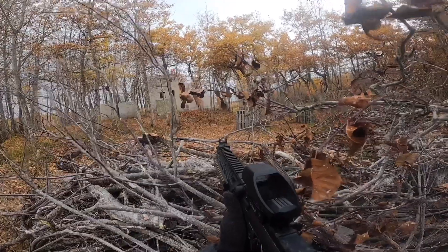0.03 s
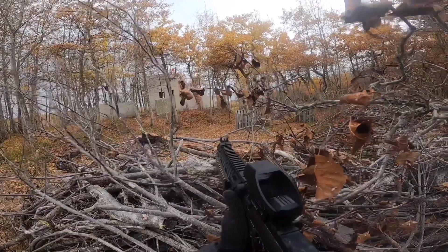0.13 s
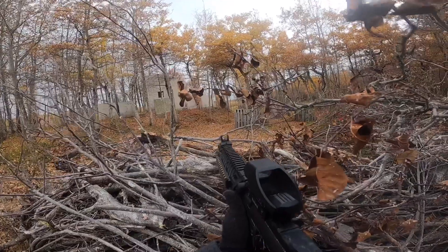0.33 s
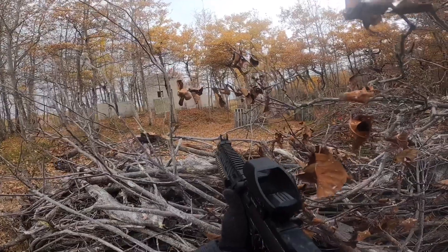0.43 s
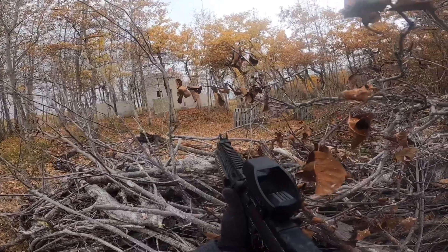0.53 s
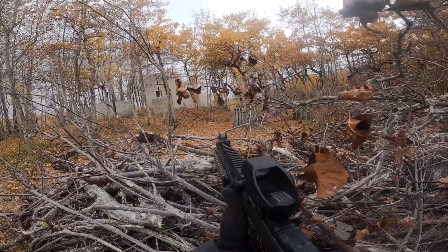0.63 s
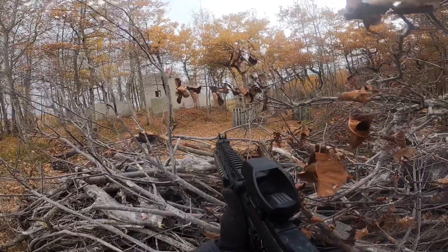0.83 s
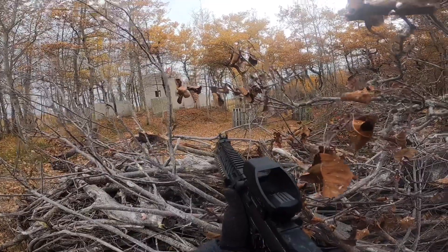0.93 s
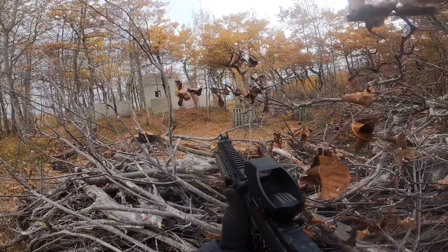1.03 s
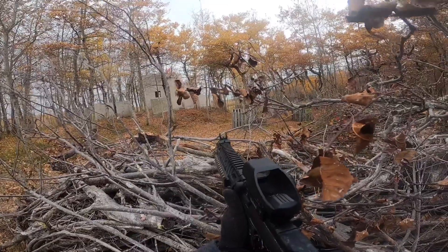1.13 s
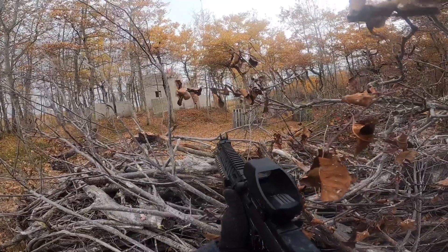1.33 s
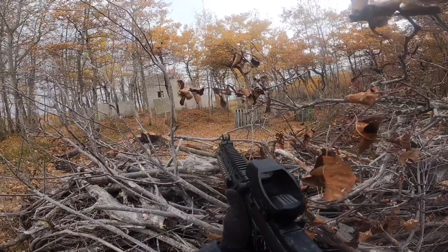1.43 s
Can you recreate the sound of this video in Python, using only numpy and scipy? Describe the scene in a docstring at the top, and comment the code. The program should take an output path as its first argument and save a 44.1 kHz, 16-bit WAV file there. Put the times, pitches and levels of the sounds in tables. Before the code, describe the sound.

A paintball gun fires once with a sharp, rattling clack in quiet woods.

```python
"""Autumn woodland: one paintball shot, heard by a small camera held against the marker (the gun).
The trigger clicks and the bolt clacks to and fro; the marker shudders and the camera housing rings.
The trees echo the clatter, then the ball smacks a far, hollow target. Underneath, leaves hiss, the
hands make a slow rumble, and a few faint tones drift in from afar."""
import sys
import numpy as np
from scipy import signal
from scipy.fft import rfft, irfft, next_fast_len
from scipy.io import wavfile
from scipy.ndimage import uniform_filter1d

SR = 44100
rng = np.random.default_rng(int(sys.argv[2]) if len(sys.argv) > 2 else 0)


def transcribe(signal):
    """Save signal, clipped to [-1, 1], as a 16-bit WAV file at the path in sys.argv[1]."""
    frames = np.atleast_2d(signal).T
    limited = np.clip(frames, -1, 1)
    pcm = np.round(limited * 32767).astype(np.int16)
    wavfile.write(sys.argv[1], SR, pcm)


N = 66150  # 1.5 seconds

# Trigger clicks, bolt clacks and small ticks. A decay is the time taken to fade by 60 dB.
# (time [s], rattle [dB], rattle decay [s], knock [dB], ring [dB], ping [dB], crack [dB],
# left over right [dB])
CLACK_HITS = [(0.2276, -38.5, 0.032, -16.5, -27, -41, -93, -5), (0.237, -56, 0.02, -35, -33, -69, -98, 13),
              (0.2673, -17, 0.039, -4.5, -18.5, -16.5, -37.5, -3.5),
              (0.28, -30, 0.057, -40, -20.5, -49, -61, 6.5),
              (.2855, -15, 0.031, -27.5, -12.5, -22, -73, -10),
              (0.2897, -17.5, 0.031, -11, -14, -29, -72, 4),
              (.298, -22.5, 0.027, -11.5, -22.5, -33.5, -44, 11.5),
              (0.3044, -14, 0.018, -15, -15.5, -27, -67, -1),
              (0.3122, -33, 0.04, -19, -31.5, -40.5, -48.5, 6),
              (0.367, -40.5, 0.018, -39, -42, -56, -89, -2), (0.397, -40, 0.047, -50, -43.5, -66, -61, -5),
              (1.48, -47.5, 0.11, -70, -51, -55, -65, -5.5)]
# Soft bumps on the marker's body: (time [s], level [dB], brightness [dB per octave])
BUMPS = [(1.1481, -38.5, 4.5), (1.158, -44, -8)]
# Shakes of the marker: (start [s], rise [s], hold [s], fall [s], sway [dB], hum [dB])
SHAKES = [(0.033, 0.0049, 0.015, 0.016, -57, -36), (0.21, 0.01, 0.019, 0.02, -28.5, -27),
          (0.266, 0.032, 0.021, 0.033, -13.5, -14.5), (0.384, 0.0075, 0.013, 0.018, -35, -46.5),
          (1.15, 0.0024, 0.0065, 0.023, -64, -37), (1.256, 0.013, 0.014, 0.016, -44, -42.5),
          (1.35, 0.0054, 0.01, 0.012, -55, -49.5)]
# The notes each part rings with when struck: (pitch [Hz], level [dB], decay [s])
BODY_NOTES = [(81.6, -1, 0.058), (193, 1.5, 0.053), (316.6, -3, 0.053), (362.4, -6, 0.056),
              (452.7, -12, 0.054), (542.2, -7, 0.051), (588, -20.5, 0.052), (802, -13, 0.018)]
HOUSING_NOTES = [(956, -1, 0.015), (1042, 2, 0.032), (1153, -1, 0.014), (1301, 0, 0.026),
                 (1514, -0.5, 0.018), (1770, -2.5, 0.015), (2170, -8.5, 0.024)]
HIGH_HOUSING_NOTES = [(3528, 1, 0.028), (3740, -8.5, 0.051), (4400, -3.5, 0.021), (5098, 4.5, 0.02)]
TARGET_NOTES = [(511, -19, 0.06), (900, -9, 0.027), (1390, 2, 0.014), (1720, 4, 0.012)]
# The tone colour of each noise in the shot: (frequency [Hz], relative level [dB])
RATTLE_COLOUR = [(700, -42), (1100, -9.5), (1700, -1.5), (2450, -23), (3100, -9), (3500, -2.5), (4100, -9),
                 (5000, -3.5), (5450, -12.5), (6400, -17.5), (7300, -26.5), (8200, -40.5), (11000, -38),
                 (15800, -59)]
CRACK_COLOUR = [(5000, -53), (7500, -5), (12000, -12.5), (15800, -42)]
SMACK_COLOUR = [(470, -47), (800, -55), (1390, 6), (1810, -43), (2350, -16), (4230, -1), (4820, -8),
                (5180, -6), (7250, -36), (12000, -47), (14000, -87)]
ECHO_COLOUR = [(350, -50), (700, -13), (950, -25), (1100, 3.5), (1250, -14), (1500, 3.5), (2300, -14.5),
               (3300, -2), (4100, -5), (4800, -8), (8200, -36), (12000, -51), (15600, -73)]
# How long the trees echo: (frequency [Hz], decay [s])
TREE_DECAYS = [(300, .3), (1500, 0.7), (2500, 0.27), (3400, 0.8), (4300, .42), (5000, 0.42), (12000, 0.19)]
# The tone colour of each background noise: (frequency [Hz], relative level [dB])
HIGH_HISS_COLOUR = [(1300, -48), (2200, -15.5), (2700, -9), (3050, -5), (3350, 0), (3750, -2), (4150, -4),
                    (4800, 3), (5400, -5), (6800, -13.5), (8600, -28), (10900, -33.5), (14000, -70),
                    (15800, -69)]
LOW_HISS_COLOUR = [(470, -74), (800, -22.5), (1100, -3), (1240, -16), (1340, -3), (1560, -8.5),
                   (1690, -11.5), (1850, -13), (2010, -21), (2300, -26.5), (2990, -34), (5060, -120)]
MURMUR_COLOUR = [(140, -36), (230, -5.5), (366, 0.5), (435, -3.5), (550, 0), (684, -12.5), (740, -19.5),
                 (800, -9.5), (1040, -44), (1760, -120)]
THRUM_COLOUR = [(35, -37), (60, -22.5), (124, -14), (193, -19), (240, -24), (310, -36.5), (530, -120)]
RUMBLE_COLOUR = [(4.7, -19), (8.0, -4.5), (16, 11), (27, 1), (65, -14), (84, -45), (140, -120)]
# Level of the background hiss, in groups of rows: (time [s], high hiss [dB], low hiss [dB])
HISS_LEVELS = [
    [(0.0, -57, -58.5), (0.2, -55.5, -60)],
    [(0.5, -63, -69), (0.558, -62, -62.5), (0.74, -64.5, -63.5), (1.018, -64, -61.5), (1.202, -62, -61),
     (1.47, -64.5, -66)],
]
# Loudness of the low noises, in groups of rows: (time [s], murmur [dB], thrum [dB], rumble [dB])
HANDLING_LEVELS = [
    [(0.0, -64.5, -37.5, -38), (0.024, -55, -57.5, -45.5), (0.068, -63, -50.5, -34),
     (0.124, -67.5, -58, -38.5), (0.144, -70, -47, -34), (0.21, -46, -41.5, -30.5)],
    [(0.37, -51, -39, -35.5), (0.482, -67.5, -74, -36), (0.512, -75, -63, -72), (0.572, -68, -57.5, -71),
     (0.584, -67.5, -60, -41.5), (0.654, -65.5, -63.5, -59), (0.69, -67.5, -54.5, -46),
     (0.9, -60.5, -63, -45.5)],
    [(0.93, -64.5, -64, -42.5), (1.05, -62.5, -64.5, -36.5), (1.15, -61.5, -55.5, -41.5),
     (1.178, -57.5, -59, -32), (1.31, -71.5, -62.5, -41), (1.356, -70, -57, -30), (1.45, -73.5, -65, -34.5),
     (1.5, -65.5, -59, -57)],
]
# Far tones: (start [s], length [s], first pitch [Hz], last pitch [Hz], level [dB])
FAR_TONES = [(0.602, 0.05, 702, 775, -60.5), (.6, 0.043, 1510, 1610, -53),
             (0.778, 0.062, 1630, 1463, -57.5)]
# Brief rustles: (start [s], length [s], centre [Hz], width [octaves], level [dB])
RUSTLES = [(0.094, 0.075, 9800, .3, -80), (0.738, 0.052, 423, 0.78, -61), (1.028, 0.26, 1077, 0.064, -63.5),
           (1.05, 0.097, 10200, .3, -83)]
# How alike left and right sound, for most noises and close ones: (frequency [Hz], likeness [-1 to 1])
LIKENESS = [(60, 0.95), (180, 0.91), (550, 0.61), (1650, 1), (4970, 0.33), (15000, 0.05)]
CLOSE_LIKENESS = [(60, 0.91), (240, 0.0094), (950, 1), (3770, 0.86), (15000, -0.11)]
# Which side is louder, for most noises and close ones: (frequency [Hz], left over right [dB])
BALANCE = [(60, 1), (150, -2.5), (380, 2), (950, -3), (2380, 6), (5980, -7), (15000, 31)]
CLOSE_BALANCE = [(60, -2), (150, 3), (380, 4), (950, -6), (2380, 12), (5980, -4), (15000, 8)]

TIME = np.arange(N) / SR  # [s]
LEFT_LAG_S = 0.000068  # the left microphone hears a little later


def clatter(knock_delay_s=0.00318):
    """Each blow makes a rattle, a crack, a ring and high ping of the camera housing, then a low knock."""
    rattle, crack, ringing, knocks = np.zeros((4, 2, N))
    for start, rattle_db, decay, knock_db, ring_db, ping_db, crack_db, left_db in CLACK_HITS:
        sides = gain([[left_db / 2], [-left_db / 2]])
        rattle += gain(rattle_db) * burst(start, rise_s=0.00077, decay_s=decay) * sides
        crack += gain(crack_db) * burst(start, rise_s=0.00075, decay_s=0.037)
        ringing += ring(start, ring_db, HOUSING_NOTES, rise_s=0.0016, detune=0.041) * sides
        ringing += ring(start, ping_db, HIGH_HOUSING_NOTES, rise_s=0.0012, detune=0.0056) * sides
        knocks += ring(start + knock_delay_s, knock_db, BODY_NOTES, rise_s=0.0019, detune=0.035)
    knocks += soft_bumps()
    rattle *= noise(RATTLE_COLOUR, patchy_db=2.5, likeness=CLOSE_LIKENESS, balance=CLOSE_BALANCE)
    crack *= noise(CRACK_COLOUR, patchy_db=1, likeness=CLOSE_LIKENESS, balance=CLOSE_BALANCE)
    return rattle + crack + ringing, knocks


def soft_bumps():
    """A soft bump makes the marker's body ring with its low notes, tilted brighter or duller."""
    out = np.zeros((2, N))
    main_hz = BODY_NOTES[1][0]
    for start, db, brightness in BUMPS:
        notes = [(hz, level + brightness * np.log2(hz / main_hz), decay)
                 for hz, level, decay in BODY_NOTES]
        out += ring(start, db, notes, rise_s=0.0015, detune=0.03)
    return out


def shudder(sway_hz=36, hum_hz=110, sway_lag_s=0.0012):
    """The marker sways and hums in the hands, which soon calm it."""
    out = np.zeros((2, N))
    for start, rise, hold, fall, sway_db, hum_db in SHAKES:
        t = TIME - start
        ramp = np.clip(np.minimum(t / rise, (rise + hold + fall - t) / fall), 0, 1)
        sway = gain(sway_db) * np.sin(2 * np.pi * sway_hz * (t - np.array([[sway_lag_s], [0]])))
        hum = gain(hum_db) * np.sin(2 * np.pi * hum_hz * t) * gain([[-0.6], [0.6]])
        out += np.sin(np.pi / 2 * ramp) * (sway + hum)
    return out


def tree_echoes(sound, delay_s=0.03):
    """The trees scatter a sound back; each frequency dies away at its own speed."""
    hz, t, spectrum = signal.stft(rng.standard_normal((2, SR // 2)), SR, nperseg=256)
    fade = gain(-60 * t / look_up(TREE_DECAYS, hz)[:, None])
    tail = signal.istft(spectrum * fade, SR, nperseg=256)[1]
    delayed = np.pad(sound, ((0, 0), (round(delay_s * SR), 0)))
    return signal.fftconvolve(delayed, tail / np.linalg.norm(tail[0]), axes=1)[:, :N]


def ball_smack(start=0.5525, echo_hold_s=0.16, echo_fade_s=0.062):
    """The ball knocks on a far hollow target, bursts just after, and echoes among the trunks."""
    splash = burst(start + 0.0012, rise_s=0.0004, decay_s=0.028) * noise(SMACK_COLOUR, patchy_db=1)
    echo = burst(start, rise_s=0.0022, decay_s=0.43) * noise(ECHO_COLOUR, patchy_db=1.5)
    echo *= np.clip((start + echo_hold_s + echo_fade_s - TIME) / echo_fade_s, 0, 1)
    knock = ring(start, db=-30, notes=TARGET_NOTES, rise_s=0.001, detune=0.017)
    return knock + gain(-34) * splash + gain(-45) * echo


def leaf_hiss():
    """Leaves hiss in a high and a low band; the level heard dips after the shot and partly recovers."""
    high, low = loudness_curves(HISS_LEVELS)
    return high * noise(HIGH_HISS_COLOUR, patchy_db=1.5) + low * noise(LOW_HISS_COLOUR, patchy_db=2.5)


def handling():
    """Holding the camera makes a slow rumble, with a low thrum and a murmur above it."""
    murmur, thrum, rumble = loudness_curves(HANDLING_LEVELS)
    return (murmur * noise(MURMUR_COLOUR, patchy_db=2.5)
            + thrum * noise(THRUM_COLOUR, patchy_db=1.5)
            + rumble * noise(RUMBLE_COLOUR, patchy_db=0.8))


def far_tones():
    """Faint, short tones slide up or down in the distance."""
    out = np.zeros(N)
    for start, length, first_hz, last_hz, db in FAR_TONES:
        progress = np.clip((TIME - start) / length, 0, 1)
        cycles = length * (first_hz * progress + (last_hz - first_hz) * progress ** 2 / 2)
        out += gain(db) * np.sin(np.pi * progress) * np.sin(2 * np.pi * cycles)
    return out


def rustles():
    """Bands of soft rustling swell and sink again."""
    out = np.zeros((2, N))
    for start, length, hz, width, db in RUSTLES:
        progress = np.clip((TIME - start) / length, 0, 1)
        swell = np.sqrt(np.abs(np.sin(np.pi * progress)))
        band = [(hz * 2 ** (step * width), -9 * step ** 2) for step in range(-3, 4)]
        out += gain(db) * swell * noise(band, patchy_db=0)
    return out


def ring(start, db, notes, rise_s, detune):
    """A struck part rings briefly, a little differently each time and on each side."""
    t = np.arange(SR // 12) / SR
    heard_t = t - LEFT_LAG_S * np.array([[1], [0]])
    out, first = np.zeros((2, N + len(t))), round(start * SR)
    for hz, level, decay in notes:
        strength, pitch, skew = rng.standard_normal(3)
        spread = 0.29 * min(hz / 300, 1)  # [radians]; low notes stay more in step on the two sides
        phase = 2 * np.pi * hz * (1 + detune * pitch) * heard_t + spread * skew * np.array([[1], [-1]])
        loudness = gain(db + level + 2 * strength - 60 * t / decay) * (1 - np.exp(-t / rise_s))
        out[:, first:first + len(t)] += loudness * np.sin(phase)
    return out[:, :N]


def burst(start, rise_s, decay_s):
    """The loudness of a blow: it rises quickly, then dies away."""
    t = np.maximum(TIME - start, 0)
    return (1 - np.exp(-t / rise_s)) ** 2 * gain(-60 * t / decay_s)


def noise(colour, patchy_db, likeness=LIKENESS, balance=BALANCE):
    """Stereo noise of strength 1 in a given tone colour, with random louder and softer patches."""
    def shared_and_opposite(hz):
        angle = np.arccos(np.clip(look_up(likeness, hz), -1, 1)) / 2
        return gain(look_up(colour, hz)) * [np.cos(angle), np.sin(angle)]

    def microphones(hz):
        lag = np.exp(1j * np.pi * hz * LEFT_LAG_S * [[-1], [1]])
        return gain(look_up(balance, hz) / 2 * [[1], [-1]]) * lag

    spectrum = signal.stft(rng.standard_normal((2, N)), nperseg=512)[2]
    patches = uniform_filter1d(rng.standard_normal(spectrum.shape[1:]), 6, axis=0)  # blur in frequency
    patches = uniform_filter1d(patches, 10, axis=1)  # blur in time
    patchy = signal.istft(spectrum * gain(patchy_db * normalised(patches)), nperseg=512)[1][:, :N]
    shared, opposite = filtered(patchy, shared_and_opposite)
    return normalised(filtered(np.array([shared + opposite, shared - opposite]), microphones))


def filtered(sound, response):
    """Scale and delay each frequency of a sound as response(hz) says."""
    size = next_fast_len(N + SR // 2)
    hz = np.fft.rfftfreq(size, 1 / SR)
    return irfft(rfft(sound, size) * response(hz), size)[..., :N]


def loudness_curves(table):
    """Turn each dB column of a timed table into one gain per sample."""
    times, *columns = np.vstack(table).T
    return [gain(np.interp(TIME, times, db)) for db in columns]


def look_up(table, hz):
    """Read between the rows of a (frequency, value) table, with octaves about evenly spaced."""
    frequencies, values = np.transpose(table)
    return np.interp(np.log(hz + 1), np.log(frequencies + 1), values)


def gain(db):
    """Turn decibels into a number to multiply by."""
    return 10 ** (np.asarray(db) / 20)


def normalised(x):
    """Scale to an average strength (root mean square) of 1."""
    return x / np.sqrt(np.mean(x ** 2) + 1e-20)


def scene():
    """Add up the marker, its echoes, the far hit and the background."""
    clacks, knocks = clatter()
    echoes = gain(-25.5) * tree_echoes(clacks + 0.36 * knocks)
    shot = clacks + knocks + shudder() + echoes + ball_smack()
    return shot + leaf_hiss() + handling() + far_tones() + rustles()


def record(dry, ceiling=0.95, knee=6, fade_in_s=0.004, bottom_hz=5, top_hz=15800):
    """The camera rounds off tall peaks and drops the slowest drift and the highest treble."""
    rounded = dry / (1 + np.abs(dry / ceiling) ** knee) ** (1 / knee)
    fade_in = np.minimum(TIME / fade_in_s, 1)
    return filtered(rounded * fade_in, lambda hz: (hz < top_hz) * 1j * hz / (bottom_hz + 1j * hz))


dry = scene()
out = record(dry)
transcribe(out)
```